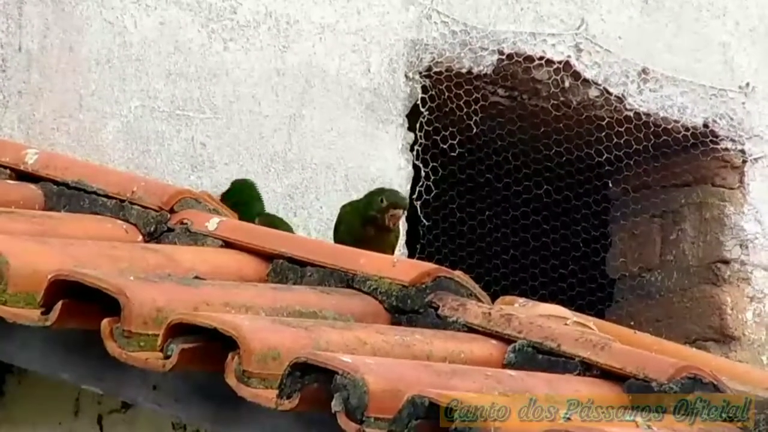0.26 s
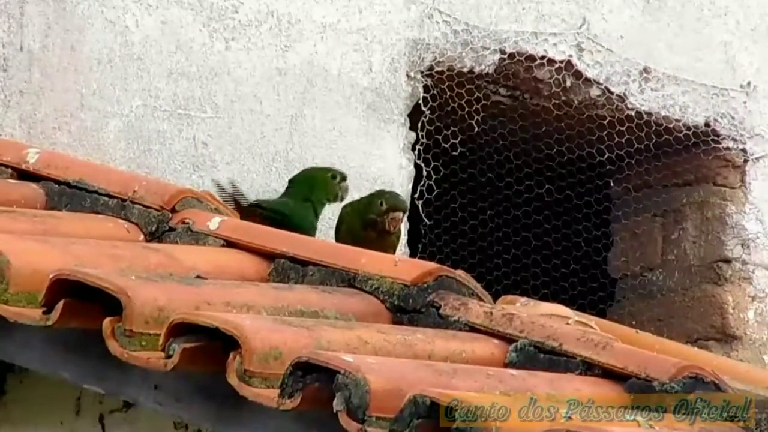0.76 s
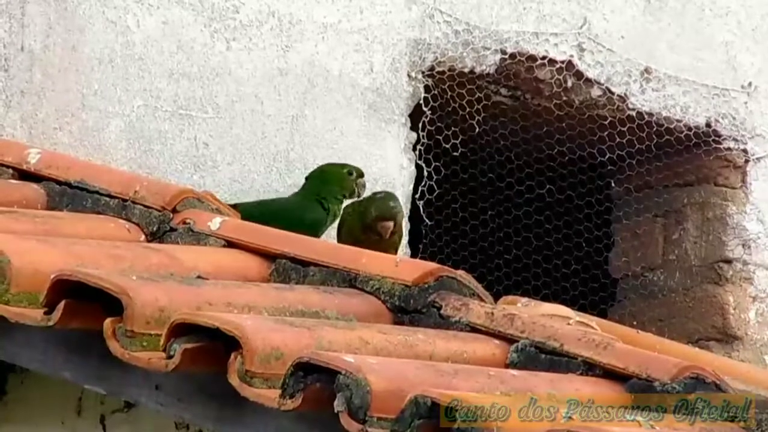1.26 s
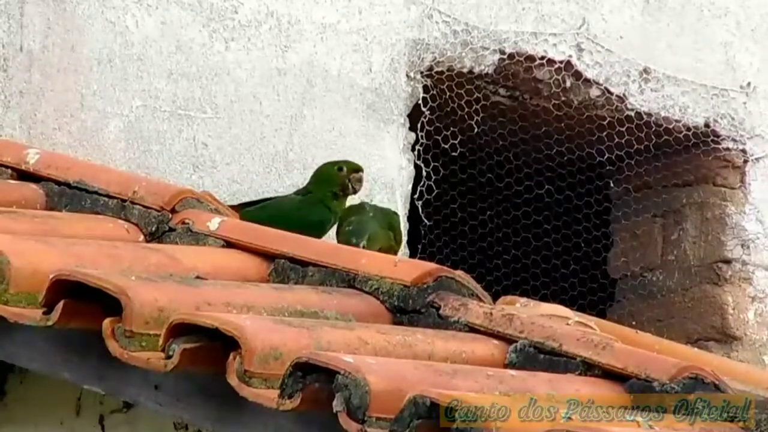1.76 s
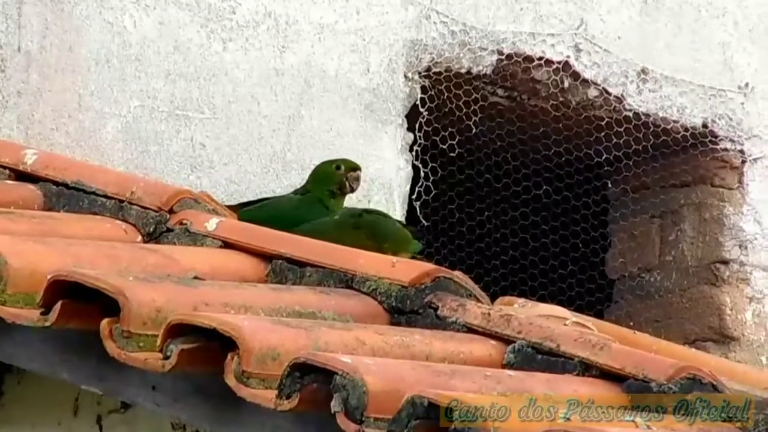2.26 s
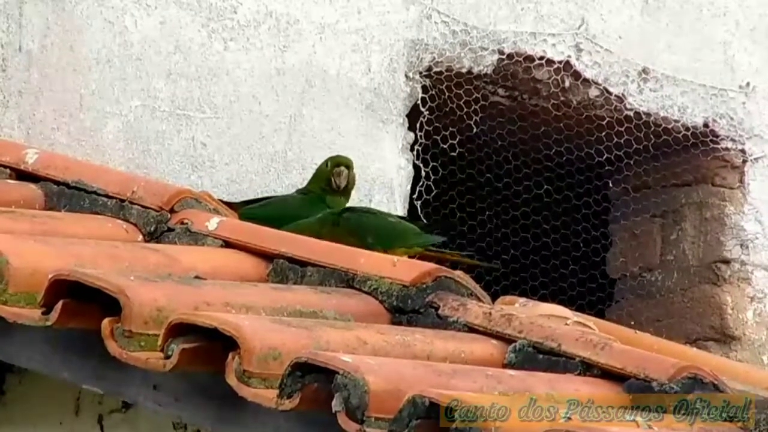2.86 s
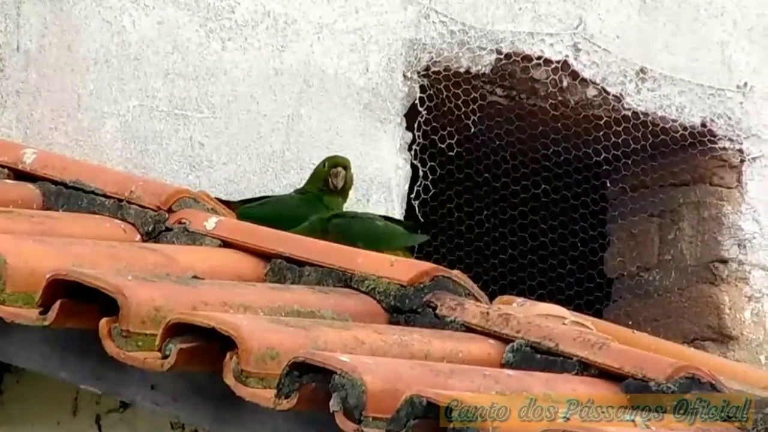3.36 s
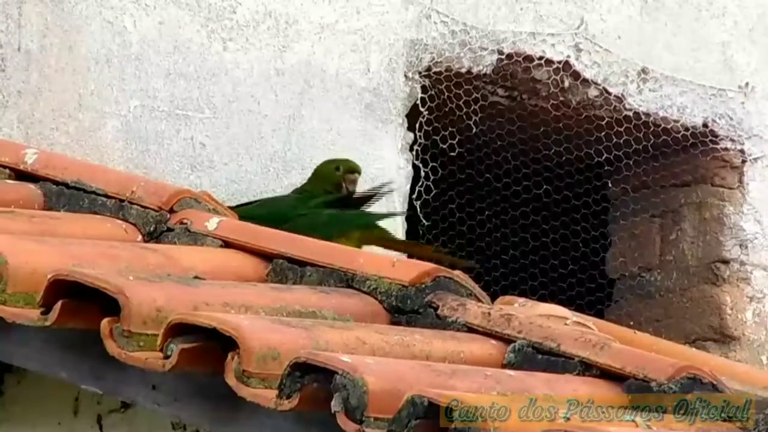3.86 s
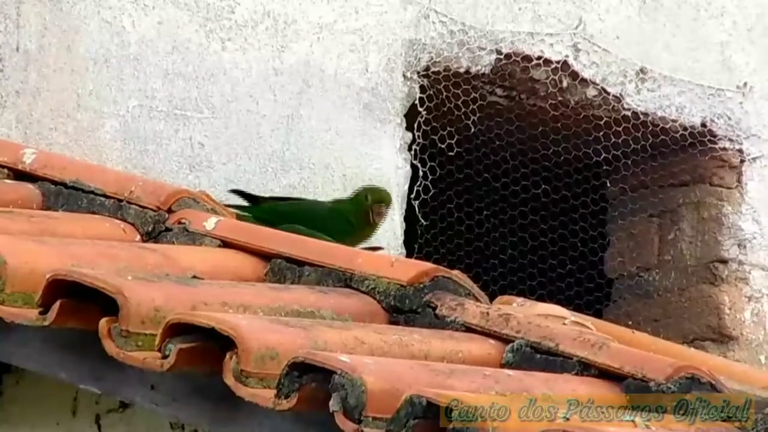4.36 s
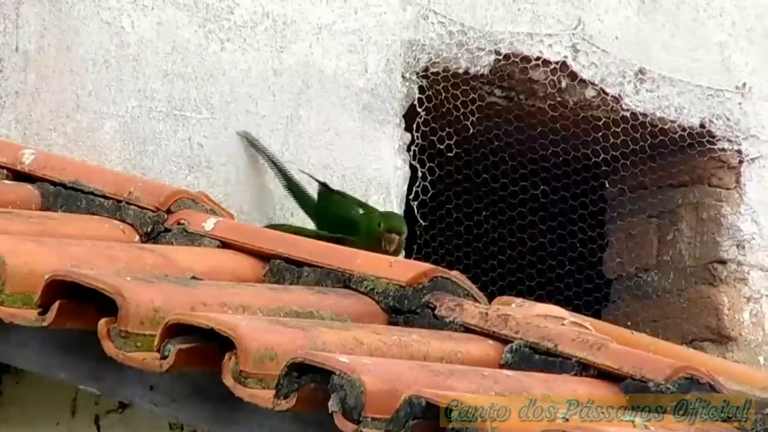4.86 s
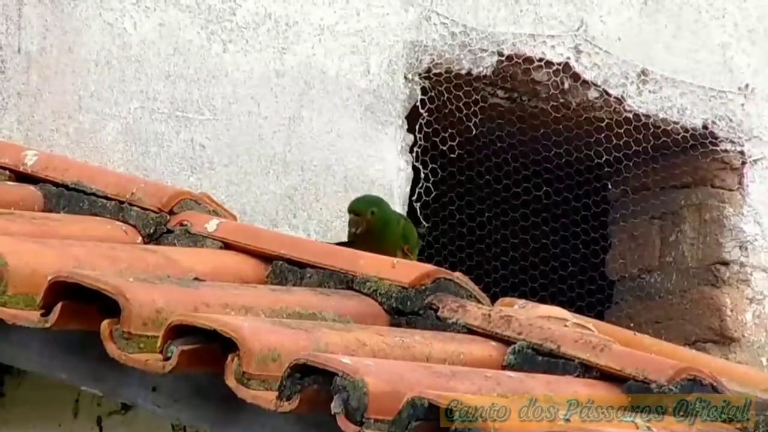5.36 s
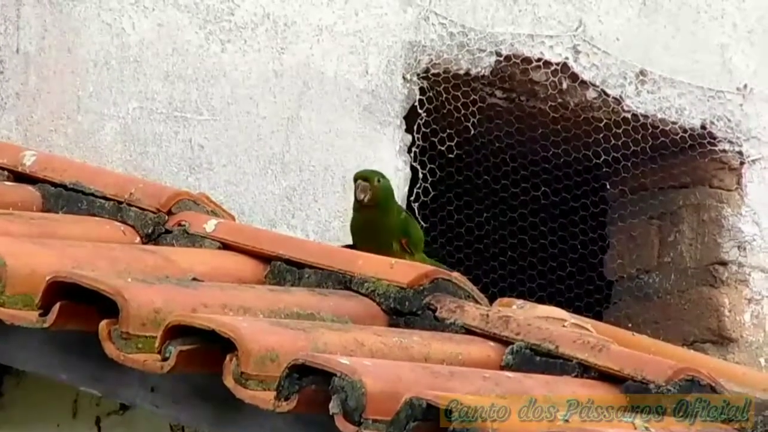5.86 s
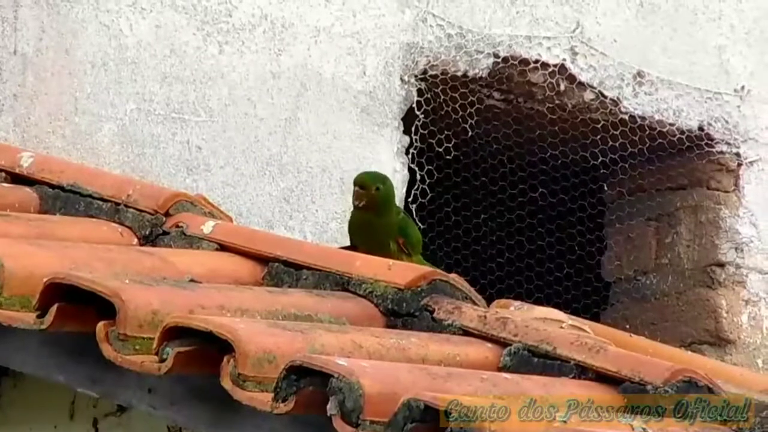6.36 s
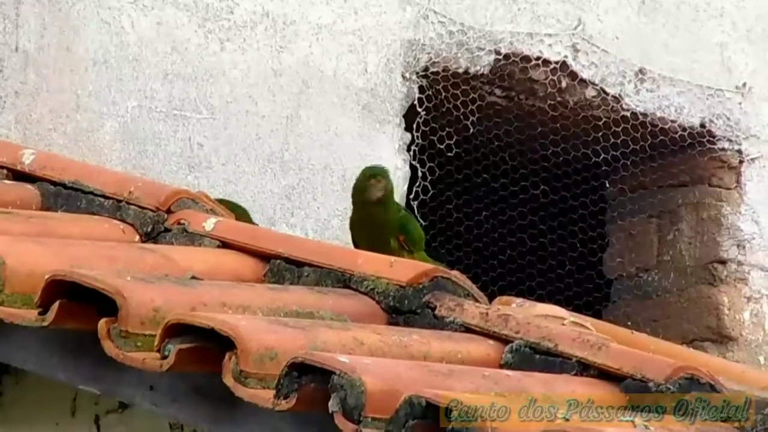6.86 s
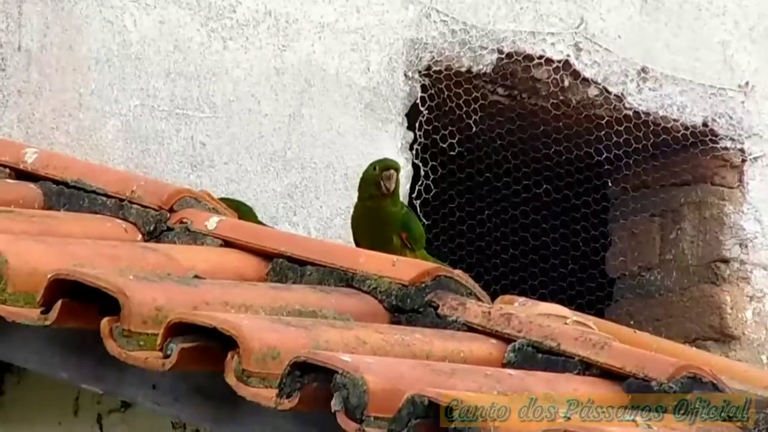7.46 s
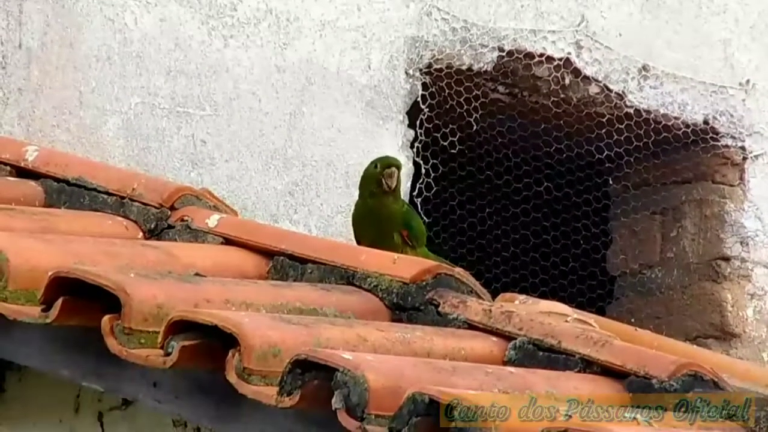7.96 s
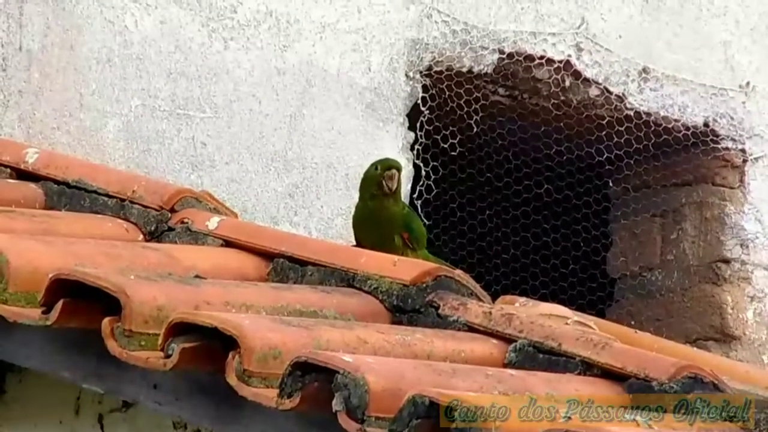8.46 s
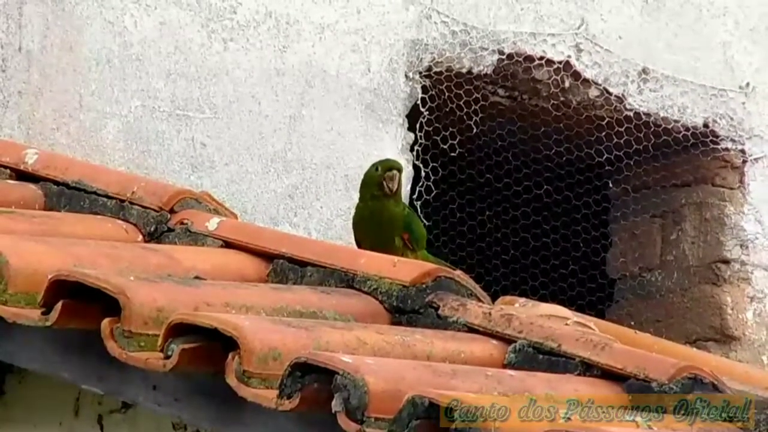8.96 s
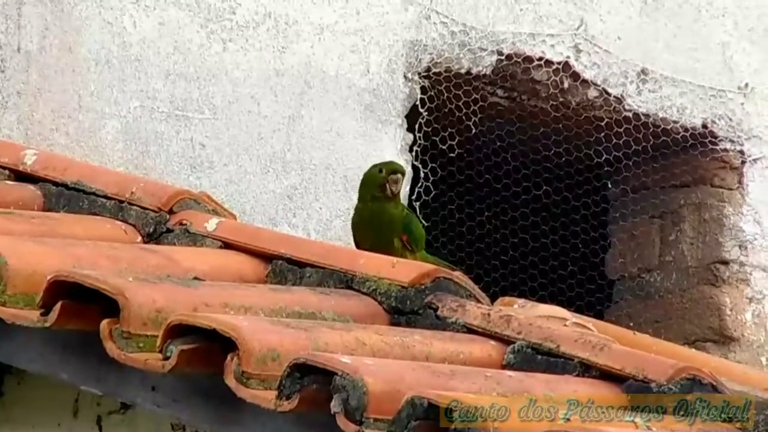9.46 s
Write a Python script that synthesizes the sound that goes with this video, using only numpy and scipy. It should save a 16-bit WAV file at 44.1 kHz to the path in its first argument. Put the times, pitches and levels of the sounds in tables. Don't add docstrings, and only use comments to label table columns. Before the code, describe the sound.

The tail of an earlier screech fades in a walled outdoor yard over low traffic rumble and soft air hiss. At about 0.15 to 0.35 seconds parakeets give a quick, raspy, moderately loud burst. Faint, thin songbird chirps glide around 0.7 to 1.05, with single ones near 1.6 and 2.2. Distant hammer blows ring on steel at roughly 1.5, 1.9, 2.4 and 3.0, each generally stronger, the last sharpest. From 3.4 the parakeets launch a loud, frantic run until 7.3: very short grating rasps, squeals, yelps and shrill near-whistles leap in pitch, breathy and rough, broken by tiny pauses near 3.9, 4.85, 5.2, 5.5 and 6.4. It weakens around 6.9, flares at 7.1 and dies. About a second of quiet rumble follows, then a final short squawk at 8.4 to 8.6, its echo fading into gently swelling traffic until the end, around 9.7.

```python
import sys
import numpy as np
from scipy import signal
from scipy.fft import rfft, irfft, next_fast_len
from scipy.io import wavfile
from scipy.ndimage import uniform_filter1d, map_coordinates

SR = 44100
rng = np.random.default_rng(int(sys.argv[2]) if len(sys.argv) > 2 else 0)


def convert_level_to_amplitude(level_db):
    exponent = np.asarray(level_db, float) / 20
    return 10 ** exponent


def store_wav(level_fs):
    pcm = np.round(np.clip(np.atleast_2d(level_fs), -1, 1) * 32767)
    wavfile.write(sys.argv[1], SR, pcm.T.astype(np.int16))


N = 428211


def unit(x):
    return x / np.sqrt(np.mean(x ** 2) + 1e-20)


def along(points, hz):
    f, v = np.transpose(points)
    return np.interp(np.log(hz + 1), np.log(f + 1), v)


def curves(rows):
    s, *cols = np.transpose(rows)
    return [np.interp(np.arange(N) / SR, s, c) for c in cols]


def wobble(rate, size=N):
    knots = rng.standard_normal(int(size * rate / SR) + 4)
    return map_coordinates(knots, [np.arange(size) * rate / SR])


def filtered(x, response):
    m = next_fast_len(x.shape[-1] + 4096)
    return irfft(rfft(x, m) * response(np.fft.rfftfreq(m, 1 / SR)), m)[..., :x.shape[-1]]


def swell(t, length, rise, fall):
    return np.clip(np.minimum(t / rise, (length - t) / fall), 0, 1) ** 0.8


# (frequency [Hz], left-right likeness [0-1])
LIKENESS = [(60, 0.85), (200, 0.91), (600, 0.7), (1600, 1), (5000, 0.1)]


def rush(spectrum, lag, patchy_db):
    z = signal.stft(rng.standard_normal((2, N)), nperseg=512)[2]
    field = uniform_filter1d(rng.standard_normal(z.shape[1:]), 6, 0)
    patches = unit(uniform_filter1d(field, 14, 1))
    pair = signal.istft(z * convert_level_to_amplitude(patchy_db * patches), nperseg=512)[1][:, :N]

    def turn(hz):
        return np.arccos(np.clip(along(LIKENESS, hz), -1, 1)) / 2

    mid, side = filtered(pair, lambda hz: convert_level_to_amplitude(along(spectrum, hz)) * [np.cos(turn(hz)), np.sin(turn(hz))])
    left = filtered(mid + side, lambda hz: np.exp(-2j * np.pi * hz * lag))
    return unit(np.array([left, mid - side]))


# (time [s], level [dB])
TRAFFIC = [
    (0.0, -41),
    (0.65, -46.5),
    (5.38, -44.5),
    (5.9, -49.5),
    (6.16, -45.5),
    (9.71, -43),
]
# (frequency [Hz], density [dB per Hz])
RUMBLE_TONE = [(12, -21), (20, -2.5), (125, 1), (151, 1), (182, -1), (357, -4.5), (500, -7), (650, -103),
               (1100, -120)]
# (frequency [Hz], density [dB per Hz])
AIR_TONE = [(150, -41), (250, -9.5), (447, -13), (685, -7), (947, -5.5), (1200, -9), (3590, -14.5),
            (6980, -24.5), (12700, -25), (14800, -21.5)]


def town():
    lag_s = 5 / SR
    rumble = convert_level_to_amplitude(curves(TRAFFIC)[0] + 1.2 * wobble(3)) * rush(RUMBLE_TONE, lag_s, patchy_db=2)
    hiss = convert_level_to_amplitude(-44.0 + 0.66 * wobble(1.51)) * rush(AIR_TONE, lag_s, patchy_db=1.4)
    return rumble * convert_level_to_amplitude([[-.3], [.3]]) + hiss * convert_level_to_amplitude([[-1], [1]])


# (frequency [Hz], density [dB per Hz])
THROAT_TONE = [(500, -28.5), (750, -11), (1200, -14.5), (1600, -5), (2200, -11.5), (2700, 0), (4300, -3.5),
               (5500, -8.5), (6700, -4), (8000, -14.5), (9600, -24), (11000, -19), (12700, -33),
               (14000, -23)]


def earlier_call():
    t = np.arange(N) / SR
    return convert_level_to_amplitude(-32.0 - 60 * t / 1.04 + 1.4 * wobble(45)) * rush(THROAT_TONE, 0, patchy_db=2.5)


# (time [s], pitch [Hz], level [dB], roughness [0 to about 1.2])
WHISTLE_NOTES = [(3.675, 2720, -22.5, 0.8), (3.976, 2930, -14, 0.83), (4.028, 2710, -16, 0.67),
                 (4.062, 2590, -19.5, 1.2), (4.636, 3544, -15, 0.48), (4.664, 2828, -19.5, 0.6),
                 (4.724, 2735, -21.5, 0.24), (4.988, 3110, -15, 0.93), (5.024, 2908, -16, 0.54),
                 (5.411, 2750, -20.5, 0.58), (5.583, 3060, -23, 0.8), (5.72, 3440, -14.5, 0.86),
                 (5.767, 2934, -16, 0.3), (5.874, 3600, -14, 0.69), (5.897, 2995, -18, 0.85),
                 (5.925, 3003, -19, 0.9), (6.079, 2880, -15.5, 0.1), (6.104, 2925, -18.5, 1.17),
                 (6.733, 2747, -28.5, 1.15), (7.069, 3010, -20, 0.6), (7.14, 2920, -25.5, 1.23),
                 (8.418, 2960, -27.5, 1.07), (8.526, 3043, -16, 0.02)]
# (time [s], pitch [Hz], level [dB], roughness [0 to about 1.2])
SQUEAL_NOTES = [(.226, 1805, -20.5, 0.66), (.25, 1482, -31, 1.2), (.292, 1600, -29, 0.94),
                (.303, 1910, -21, .4), (.315, 1480, -19.5, 0.56), (.342, 1433, -20, 1.07),
                (3.553, 1403, -21.5, 0.63), (3.567, 1682, -18.5, 0.46), (3.641, 1783, -19.5, 0.1),
                (3.665, 1665, -12, 0.2), (3.992, 1815, -15, 0.4), (4.271, 1122, -20.5, 0.6),
                (4.301, 1330, -19, 0.63), (4.477, 2365, -20, 0.87), (4.71, 2200, -21.5, 0.6),
                (5.038, 1741, -18, 0.84), (5.458, 1387, -25.5, 0.59), (5.608, 2260, -21.5, 0.77),
                (6.674, 1778, -25, 0.92), (7.086, 1893, -16.5, 0.47), (8.405, 1210, -31, 1.17),
                (8.46, 1430, -20.5, 1.05), (8.472, 1930, -27, 0.6), (8.512, 1534, -16.5, 1.23),
                (8.545, 2474, -26.5, 0.54), (8.611, 1691, -29, .3), (5.623, 1680, -19.5, 0.46),
                (4.288, 1760, -20, 0.44), (8.556, 1801, -16.5, 0.19), (8.575, 1691, -17.5, .35)]
# (time [s], pitch [Hz], level [dB], roughness [0 to about 1.2])
YELP_NOTES = [
    (4.206, 1060, -25, 1.23),
    (4.244, 1009, -22, 0.7),
    (5.002, 846, -27, 1),
    (5.085, 838, -30.5, 1.2),
    (5.628, 980, -27, 1),
    (6.171, 1193, -22.5, 0.95),
    (6.322, 1016, -26, 0.74),
    (6.591, 977, -21, 1.15),
    (6.899, 670, -33.5, 0.92),
    (8.622, 838, -21, 0.68),
]
# (time [s], pitch [Hz], level [dB], roughness [0 to about 1.2])
RASP_NOTES = [(.213, 726, -17.5, 0.46), (.275, 722, -20.5, 1.16), (3.603, 666, -21, 0.3),
              (3.745, 646, -24, 1.07), (3.912, 722, -17, 0.1), (3.948, 635, -26.5, 1.1),
              (3.964, 708, -15, 0.54), (4.004, 717, -16, 0.63), (4.08, 735, -20.5, 1.15),
              (4.391, 665, -30, 1.23), (4.569, 663, -20, 0.5), (4.603, 885, -18.5, 1.1),
              (4.626, 731, -14.5, 0.8), (4.9, 638, -17.5, 0.1), (4.952, 840, -20, 0.47),
              (5.305, 688, -17, 0.98), (5.548, 744, -21, 0.93), (5.672, 681, -19.5, 0.63),
              (5.734, 873, -16.5, 0.65), (5.786, 724, -16, 0.86), (5.985, 659, -17.5, 0.31),
              (6.033, 887, -16, 0.68), (6.548, 729, -20, 0.62), (6.646, 687, -17, 0.67),
              (6.76, 700, -22.5, .5), (6.812, 653.6, -27.5, 0.99), (7.019, 630, -18, 0.08),
              (7.041, 669, -18.5, 0.8), (7.119, 750, -13, 0.43), (8.442, 662, -23, 0.3)]
# (time [s], pitch [Hz], level [dB], roughness [0 to about 1.2])
GRATE_NOTES = [(.163, 587, -23.5, 0.74), (.191, 681, -18.5, 0.66), (3.381, 555, -31, .15),
               (3.591, 700, -15, 0.3), (3.613, 591, -21.5, 0.88), (4.05, 686, -17.5, 0.6),
               (4.191, 920, -25, 0.54), (4.421, 698, -17.5, 0.1), (4.451, 968, -18, 1.03),
               (4.499, 799, -16, 0.54), (4.593, 683, -16, 0.6), (4.744, 535, -26, 1.05),
               (4.888, 601, -16, 0.1), (4.934, 701, -25.5, 0.75), (5.199, 506, -25, 0.73),
               (5.295, 583, -17.5, .35), (5.353, 714, -15.5, 0.03), (5.377, 620, -16.5, .45),
               (5.706, 750, -16, 1.1), (5.974, 610, -17, 0.67), (6.051, 710, -17, 0.66),
               (6.203, 727, -20.5, 0.42), (6.307, 598, -29.5, .63), (6.37, 593, -23.5, 0.29),
               (6.448, 679, -14.5, .45), (6.486, 708, -18, 1), (6.718, 670, -23, 1.1),
               (7.009, 583, -24, 0.27), (7.213, 484, -32, .7), (7.24, 510, -28.5, .83)]
SILENCES = [
    .35,
    3.441,
    3.862,
    4.831,
    5.161,
    5.529,
    6.43,
    6.959,
    7.341,
    8.632,
]
GLIDES = [(-0.017, 0.0454), (-0.0736, 0.267), (0.052, 0.054), (.03, 0.11), (.02, .12)]
LEAP = .33
ATTACK_S, FRESH_ATTACK_S = .0051, .022
RELEASE_S, LAST_RELEASE_S = 0.0048, 0.031
FRESH_RISE = 0.1217


def phrases():
    kinds = [WHISTLE_NOTES, SQUEAL_NOTES, YELP_NOTES, RASP_NOTES, GRATE_NOTES]
    notes = sorted(tuple(row) + (picked,) for picked, kind in enumerate(kinds, 1) for row in kind)
    followers = notes[1:] + [(np.inf, 1, 1)]
    out, fresh = [], True
    for (s, hz, db, rough, picked), (next_s, next_hz, *_, then) in zip(notes, followers):
        rest = min(r for r in SILENCES if r > s)
        last = rest < next_s
        drift, reach = GLIDES[picked - 1]
        step = np.log(next_hz / hz)
        if abs(step) < LEAP and next_s < rest and (then > 1 or picked == 1):
            slide = np.clip(step, -reach, reach)
        else:
            slide = drift + fresh * FRESH_RISE
        attack = FRESH_ATTACK_S if fresh else ATTACK_S
        release = LAST_RELEASE_S if last else RELEASE_S
        start = s - (attack - ATTACK_S) / 2
        stop = min(next_s, rest + LAST_RELEASE_S / 2)
        out.append((start, stop, attack, release, hz, hz * np.exp(slide), db, rough, picked))
        fresh = last
    return out


# (time [s], treble tilt [dB per octave])
BEAK_OPENING = [(.2, -1.5), (3.4, -2.5), (3.7, 0), (4.1, -1), (4.45, 0), (4.8, -0.5), (5.2, 0), (5.56, 1),
                (5.8, 1), (6.2, -1), (6.5, 1), (6.75, 1), (6.9, -4.5), (7.1, -1), (8.45, -0.5), (8.6, 1.5)]
HOLD_S, FADE_DB_PER_S, FRAY_PER_S = 0.021, 90, 14
WARBLE = .024
SLIDE_BEND = 0.655


def parakeets():
    open_db = curves(BEAK_OPENING)[0]
    voice, breath = np.zeros((2, N)), rng.standard_normal(N)
    flutter, shimmer, warble = wobble(160), wobble(140), wobble(65)
    notes = phrases()
    feeds = rng.standard_normal((len(notes), 40))
    for (s, stop, attack, release, from_hz, to_hz, db, rough, picked), feed in zip(notes, feeds):
        at = np.arange(round(s * SR) - 110, round(stop * SR) + 110)
        t = (at - at[0]) / SR
        tired_s = np.maximum(t - HOLD_S, 0)
        rough = np.clip(rough + FRAY_PER_S * tired_s, 0, 1.2)
        bright = open_db[at[0]] + 0.52 * (db + 27.5)
        tune_hz = picked * (from_hz + to_hz) / 2

        def colour(hz):
            return convert_level_to_amplitude(along(THROAT_TONE, hz) + bright * np.log2(np.maximum(hz, 3000) / 3000))

        def tuned(hz, centre):
            return 1 + 1.37 / (1 + ((hz - centre) / 220) ** 2)

        glide = from_hz + (to_hz - from_hz) * (t / t[-1]) ** SLIDE_BEND
        pitch = glide * (1 + (.002 + .01 * rough ** 2) * flutter[at] + WARBLE * rough * warble[at])
        turns = np.cumsum(pitch) / SR
        order = np.arange(1, int(15000 / max(from_hz, to_hz)))[:, None]
        strength = colour(order * pitch) * tuned(order * pitch, tune_hz * glide / glide.mean())
        purity_db = -9 * (order > 1) * (from_hz > 2300)
        strength = strength * convert_level_to_amplitude(2.3 * feed[order] + purity_db - 4.5 * (order * from_hz < 2200))
        tone = np.sum(strength * np.cos(2 * np.pi * order * turns + .25 * order ** 2), 0)
        puffs = breath[at] * (1 + 0.63 * np.cos(2 * np.pi * turns))
        puffs = filtered(puffs, lambda hz: colour(hz) * np.sqrt(tuned(hz, tune_hz)))
        share = .04 + .45 * rough ** 2
        mix = np.sqrt(1 - share) * unit(tone) + np.sqrt(share) * unit(puffs)
        level = convert_level_to_amplitude(db - FADE_DB_PER_S * tired_s + (1.7 + 0.72 * rough) * shimmer[at])
        note = level * swell(t, t[-1], attack, release) * mix
        voice[0, at + round(1.3 * feed[0])] += note
        voice[1, at] += note
    return voice


# (delay [s], left level [dB], right level [dB])
WALL_ECHOES = [(.0004, -6, -10), (.0021, -8, -10), (.0057, -10, -12), (.014, -13, -13), (.31, -34, -34)]
# (frequency [Hz], t60 [s])
YARD_DECAY = [(1000, .7), (3000, .68), (7000, .62), (12000, .4)]


def yard(x, wet_db):
    hz, t, z = signal.stft(rng.standard_normal((2, SR)), SR, nperseg=256)
    decay = convert_level_to_amplitude(-60 * t / along(YARD_DECAY, hz)[:, None])
    tail = signal.istft(z * decay, SR, nperseg=256)[1]
    answer = convert_level_to_amplitude(wet_db) * np.pad(tail / np.linalg.norm(tail[0]), ((0, 0), (500, 0)))
    for delay, left_db, right_db in WALL_ECHOES:
        answer[0, round(delay * SR)] += convert_level_to_amplitude(left_db)
        answer[1, round(delay * 1.17 * SR)] += convert_level_to_amplitude(right_db)
    return signal.fftconvolve(x[None], answer, axes=1)[:, :N]


# (time [s], start [Hz], middle [Hz], end [Hz], level [dB])
SMALL_BIRDS = [
    (.73, 5760, 5740, 5500, -52),
    (.735, 4880, 5070, 5100, -50),
    (.81, 3930, 4460, 4850, -52),
    (.975, 5000, 3600, 3500, -57),
    (1.02, 3600, 4070, 4800, -50),
    (1.58, 4940, 5080, 4930, -55),
    (2.22, 5040, 5000, 5300, -56),
]
CHIRP_S = .037


def songbirds():
    out, t = np.zeros(N), np.arange(round(CHIRP_S * SR)) / SR
    shape = swell(t, CHIRP_S, 0.0067, 0.0088)
    for s, *glide_hz, db in SMALL_BIRDS:
        pitch = np.polyval(np.polyfit([0, CHIRP_S / 2, CHIRP_S], glide_hz, 2), t)
        out[round(s * SR):][:len(t)] += convert_level_to_amplitude(db) * shape * np.sin(2 * np.pi * np.cumsum(pitch) / SR)
    return out


# (time [s], peak level [dB], crack level [dB])
HAMMER_BLOWS = [
    (1.473, -31, -6),
    (1.905, -24, -6),
    (2.416, -23, -2),
    (2.969, -18, 2),
]
# (frequency [Hz], level [dB], t60 [s])
STEEL_MODES = [(838, -1, 0.31), (1586, 1.5, 0.11), (1105, -7, 0.13), (1400, -6, 0.07)]


def hammer():
    out, t = np.zeros(N), np.arange(SR // 2) / SR
    for s, db, crack_db in HAMMER_BLOWS:
        ring = np.zeros(len(t))
        for hz, level, t60 in STEEL_MODES:
            ring += convert_level_to_amplitude(level + rng.normal(0, 1.5) - 60 * t / t60) * np.sin(2 * np.pi * hz * t)
        crack = rng.standard_normal(len(t)) * convert_level_to_amplitude(crack_db - 60 * t / .06)
        crack = filtered(crack, lambda hz: 1 / (1 + (hz / 2500) ** 2))
        out[round(s * SR):][:len(t)] += convert_level_to_amplitude(db - 14.5) * (ring * (1 - np.exp(-t / 0.00066)) + crack)
    return out


DUCK = 4.5


def scene():
    late, birds = parakeets()
    far = hammer() + songbirds()
    shaded = filtered(late, lambda hz: convert_level_to_amplitude(-1.93) / np.abs(1 + 1j * hz / 11000))
    echoes = yard(birds, wet_db=-10) * convert_level_to_amplitude([[-1.2], [1.2]])
    near = np.array([shaded, convert_level_to_amplitude(2.0) * birds]) + echoes
    ducked_town = town() / (1 + DUCK * uniform_filter1d(np.abs(birds), 3000))
    return near + far + yard(far, wet_db=-4) + earlier_call() + ducked_town


def band_limit(x):
    return signal.sosfilt(signal.butter(12, 15180, fs=SR, output="sos"), x)


def record(dry):
    bent = dry / (1 + np.abs(dry) ** 4) ** .25
    kept = filtered(bent, lambda hz: hz < 14250)
    return band_limit(kept)


dry = scene()
out = record(dry)
store_wav(out)
```